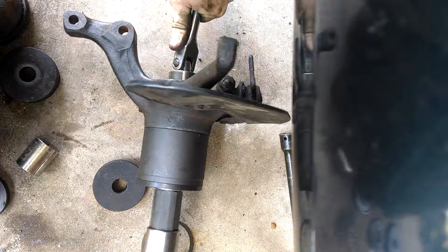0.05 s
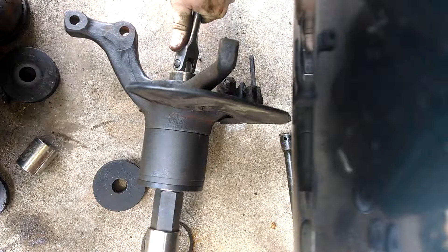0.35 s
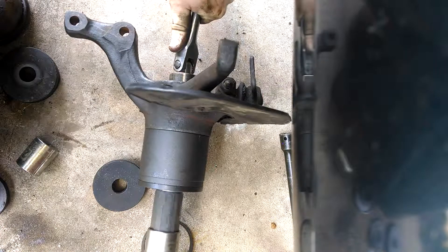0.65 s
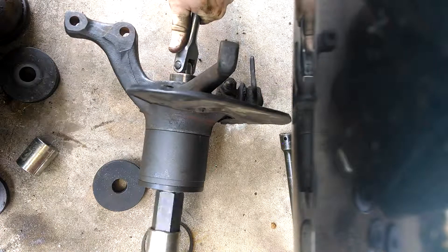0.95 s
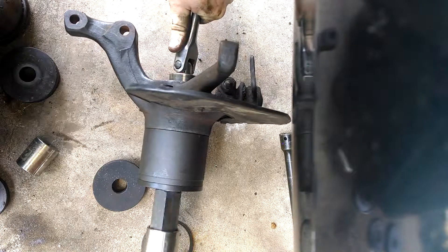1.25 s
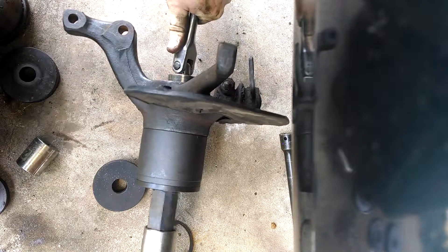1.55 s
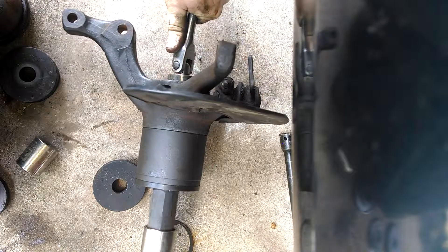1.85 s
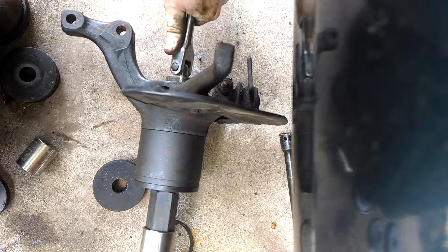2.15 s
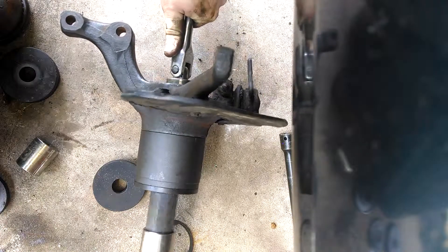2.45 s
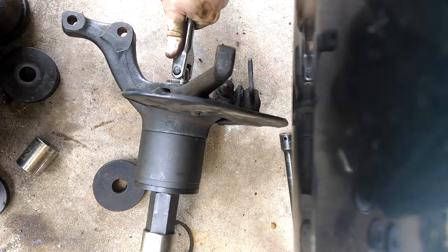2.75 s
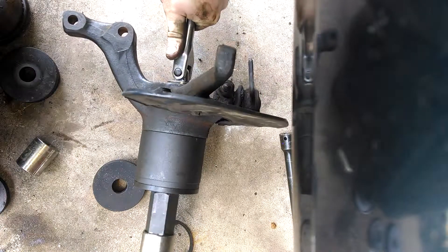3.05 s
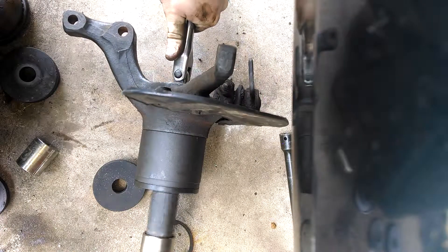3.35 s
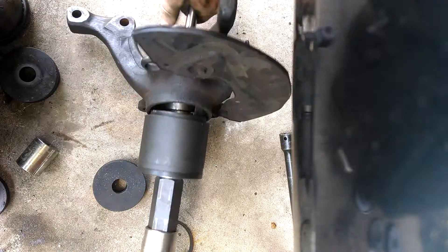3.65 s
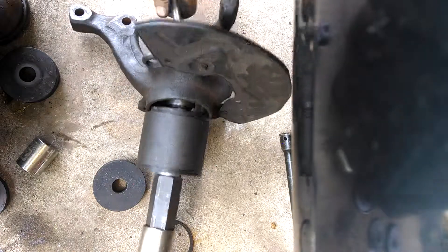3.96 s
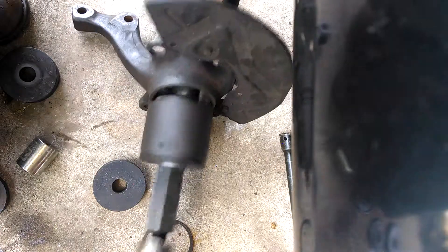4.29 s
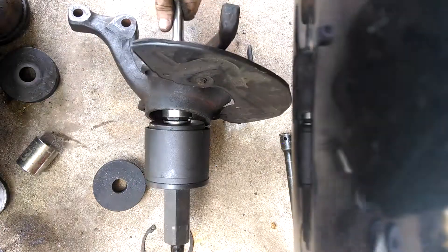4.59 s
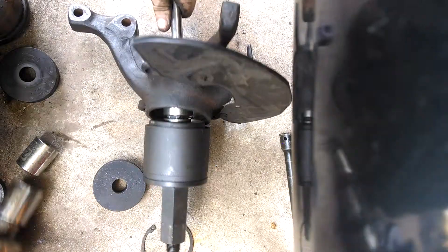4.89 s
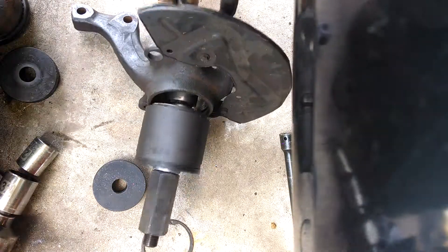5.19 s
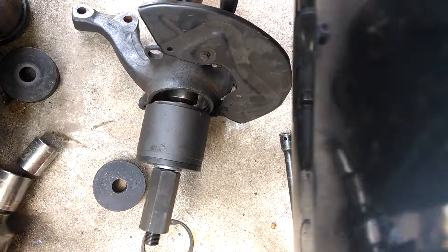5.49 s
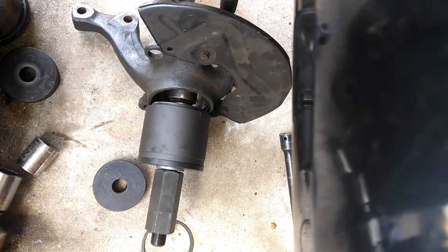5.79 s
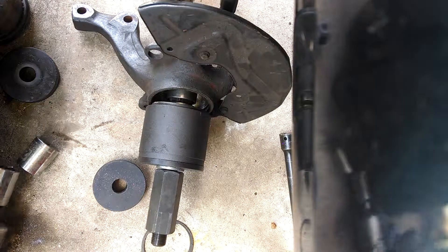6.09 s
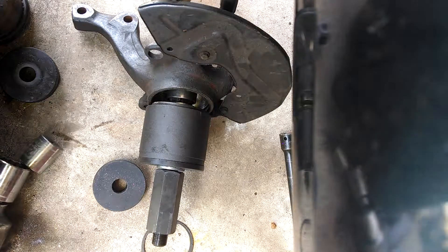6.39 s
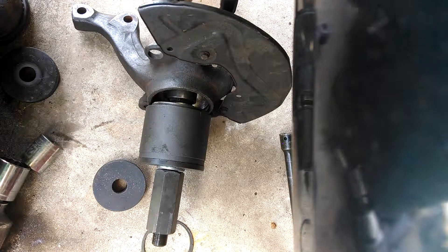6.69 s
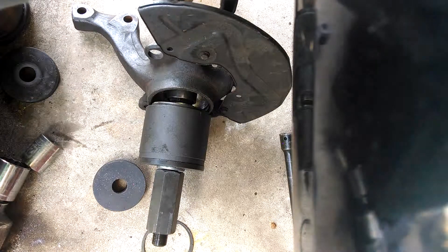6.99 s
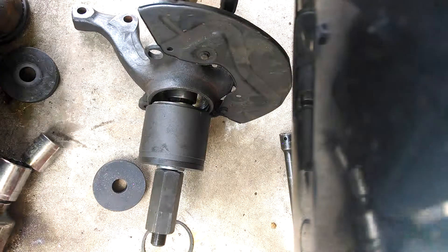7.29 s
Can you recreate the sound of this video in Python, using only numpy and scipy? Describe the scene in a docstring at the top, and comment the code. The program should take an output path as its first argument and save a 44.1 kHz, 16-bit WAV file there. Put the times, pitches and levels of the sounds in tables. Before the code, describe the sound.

An impact wrench hammers loudly on steel and stops, then loose metal parts clank over a droning workshop compressor.

```python
"""An impact wrench hammers a puller screw through a steering knuckle until the bearing comes free.
Each blow cracks steel on steel and rings the knuckle, over rattling play and the rush of the air motor.
The loose parts clank and a socket is set down, while a piston compressor drones in the workshop.
A gain control ducks under the blows, then slowly lets the drone swell back."""
import sys
import numpy as np
from scipy import signal
from scipy.fft import rfft, irfft
from scipy.io import wavfile
from scipy.ndimage import uniform_filter1d

SR = 44100
rng = np.random.default_rng(int(sys.argv[2]) if len(sys.argv) > 2 else 0)


def generate_wav(signal):
    """Clip the signal to [-1, 1] and save it as 16-bit WAV at the path in sys.argv[1]."""
    frames = np.transpose(np.atleast_2d(signal))
    scaled = np.clip(frames, -1, 1) * 32767
    pcm = np.round(scaled).astype(np.int16)
    wavfile.write(sys.argv[1], SR, pcm)


N = 323694
TIME, FREQS = np.arange(N) / SR, np.fft.rfftfreq(N, 1 / SR)
REBOUND_S, RELEASE_S = 0.033, 3.735  # hammer's bounce after a blow; trigger let go

# hammer blows, about sixteen a second: start_s, level_db
BLOWS = [(0.0014, -6.5), (0.0697, -5.5), (0.1288, -1.5), (0.1874, -4.5), (0.25, -2.5), (0.317, -5),
         (0.378, -5), (0.4379, -7), (0.5011, -3.5), (0.5642, -4), (0.627, -2), (0.687, -5), (0.756, -5),
         (0.7986, -4.5), (0.866, -4), (0.918, -6), (0.9783, -3), (1.0363, -2.5), (1.1051, -1), (1.1685, -3),
         (1.2347, -8), (1.297, -2.5), (1.367, -4), (1.4319, -1.5), (1.4932, -3), (1.551, -3), (1.6176, -2),
         (1.6834, -4.5), (1.7467, -5), (1.8052, -4), (1.864, -1.5), (1.922, -5), (1.992, 0), (2.0604, -2),
         (2.1324, -4), (2.1938, -5.5), (2.248, -6.5), (2.311, -5.5), (2.363, -6), (2.4088, -2.5),
         (2.4617, -3), (2.5319, -1.5), (2.587, -4.5), (2.6502, -3), (2.6963, -5.5), (2.7424, 0),
         (2.799, -4.5), (2.855, -2.5), (2.9156, -4.5), (2.979, -6), (3.0365, -6), (3.0968, -4),
         (3.154, -2.5), (3.211, -5.5), (3.267, -6.5), (3.325, -10), (3.3703, -8), (3.414, -5),
         (3.4617, -2.5), (3.4762, -5.5), (3.541, -3), (3.6205, -7), (3.654, -10.5), (3.678, -12),
         (3.694, -2.5), (3.7566, -1.5)]
# heavy blows that jolt the microphone: start_s, level_db
JOLTS = [(.003, -6), (0.32, 0), (0.378, -9), (1.172, -0.5), (1.619, 3), (1.686, 0), (1.75, -4),
         (1.865, -2.5), (2.589, -6), (2.8, -10), (2.857, -4), (3.373, -5), (3.416, -2.5), (3.467, 2.5),
         (3.622, -6), (3.697, -3)]
# left-right likeness, at the work (near) and across the shop (far): freq_hz, correlation
NEAR_LIKENESS = [(60, -0.5), (240, -0.05), (480, -0.27), (950, 1.03), (1900, 0.5), (2400, 1.02),
                 (2750, 0.9), (3500, 0.24), (4400, 0.36), (5100, 0.87), (6200, 0.5), (7700, 0.42),
                 (15000, -0.73)]
FAR_LIKENESS = [(60, 0.49), (150, 0.22), (380, 0.094), (950, 0.14), (1800, 0.97), (2500, 0.76),
                (3500, 0.48), (5150, 0.86), (6200, 0.29), (15000, .1)]
# how far the left side leads: freq_hz, lead_rad
NEAR_LEAD = [(0, 0), (1550, .4), (2300, -2.9), (2800, -3.3), (3700, -6.4), (4600, -3.3), (5400, -3.1),
             (6100, 0), (7060, .1), (7670, 3.3), (9300, -.6), (12800, 3.1), (15000, 1)]
FAR_LEAD = [(0, 0), (1460, -.5), (2300, -2.9), (2750, -3.4), (3700, -6.3), (5150, -9.4), (9470, -20),
            (16000, -35)]
# stereo balance: freq_hz, left_minus_right_db
NEAR_PAN = [(60, -1), (130, 13.5), (290, 10.5), (640, 4), (1410, 2.5), (3100, 0), (6820, 1.5), (15000, 4.5)]
FAR_PAN = [(60, -4), (99, 9), (160, -0.5), (270, 6.5), (450, -8.5), (740, -2.5), (1220, -1), (2010, -1.5),
           (3330, -2.5), (5500, 0), (9080, 1), (15000, 1.5)]
NEAR, FAR = (NEAR_LIKENESS, NEAR_LEAD, NEAR_PAN), (FAR_LIKENESS, FAR_LEAD, FAR_PAN)


def amp(db):
    """Decibels to gain."""
    return 10 ** (np.asarray(db) / 20)


def unit(x):
    """Scales to an rms of one."""
    return x / np.sqrt(np.mean(x ** 2) + 1e-20)


def read(points, hz):
    """Reads a table on a log-frequency axis."""
    freqs, values = np.transpose(points)
    return np.interp(np.log(hz + 1), np.log(freqs + 1), values)


def drift(rate_hz):
    """A smooth random wobble of unit size, no faster than rate_hz."""
    t = np.linspace(0, N / SR, 1500)
    speeds = rate_hz * np.geomspace(.1, 1, 12)
    wobble = np.sin(2 * np.pi * (speeds[:, None] * t + rng.random((len(speeds), 1)))).sum(0)
    return np.interp(TIME, t, unit(wobble))


def resonances(modes):
    """EQ curve of a set of resonant peaks."""
    return sum(amp(db) / (1 + ((FREQS - hz) / (width / 2)) ** 2) for hz, width, db in modes)


def noise(gain, place):
    """Coloured noise with the stereo image of one place."""
    likeness, lead, pan = (read(table, FREQS) for table in place)
    likeness = np.clip(likeness, -1, 1)
    left, other = rfft(rng.standard_normal((2, N)))
    right = (likeness * left + np.sqrt(1 - likeness ** 2) * other) * np.exp(-1j * lead)
    return unit(irfft(gain * np.array([left * amp(pan / 2), right * amp(-pan / 2)]), N))


def grain(gain, depth_db, place=NEAR, span_s=.09):
    """Noise with narrow, randomly shifting peaks, like the many close modes of steel."""
    spectrum = signal.stft(noise(gain, place), nperseg=1024)[2]
    peaks = uniform_filter1d(rng.standard_normal(spectrum.shape[1:]), int(span_s * SR / 512), axis=1)
    peaks = unit(uniform_filter1d(peaks, size=2, axis=0))
    return unit(signal.istft(spectrum * amp(depth_db * peaks))[1][:, :N])


def add(mix, s, sound):
    """Mixes a sound in at a time."""
    part = mix[..., max(round(s * SR), 0):][..., :sound.shape[-1]]
    part += sound[..., :part.shape[-1]]


def bursts(times, dbs, lengths, rise_s, tail_db, t60_s):
    """Envelope of hits: a brief chatter of steel on steel, then a dying tail."""
    t, power = np.arange(SR // 3) / SR, np.zeros(N)
    attack = (1 - np.exp(-t / rise_s)) ** 2
    for s, db, length, tail in zip(times, dbs, lengths, tail_db + np.zeros(len(times))):
        chatter = np.sqrt(2) * np.exp(-(t / max(length, 1e-3)) ** 2)
        add(power, s, amp(2 * db) * attack * (chatter + amp(2 * (tail - 60 * t / t60_s))))
    return np.sqrt(power)


def since_blow():
    """Seconds since the hammer last struck."""
    s = np.array(BLOWS)[:, 0]
    return np.maximum(TIME - s[np.maximum(np.searchsorted(s, TIME) - 1, 0)], 0)


def airflow_db(creep_db_per_s=0.8, cutoff_db_per_s=303):
    """Air flow creeps up while the trigger is held and dies once it is let go."""
    held_db = -26 + creep_db_per_s * np.minimum(TIME, RELEASE_S)
    return held_db - cutoff_db_per_s * np.clip(TIME - RELEASE_S, 0, 1)


def steel(hits, echo_s=.0112, echo_db=-4):
    """Each hit cracks and shakes the knuckle; a looser bearing rings more and the knuckle less."""
    # tone of the contact and of the body under it: freq_hz, level_db
    crack_eq = [(1800, -17), (2500, 1.5), (3200, -4), (4100, 0.5), (5100, 1), (6400, -4.5), (7500, -2.5),
                (8500, -3.5), (9300, -6.5), (10300, -1.5), (11000, -7.5), (11600, -6), (12900, -13),
                (14000, -14), (15000, 0)]
    body_eq = [(150, -15.5), (400, 2), (650, -3), (1000, -1.5), (1400, -1.5), (1950, 4), (2400, -1.5),
               (3200, -46)]
    # modes of the clamped knuckle and the freed bearing: pitch_hz, width_hz, level_db
    knuckle_modes = [(1926, 170, 7.5), (3193, 110, 9), (3664, 120, 4.5), (3870, 140, 3.5), (4640, 150, -4),
                     (5830, 180, 0.5), (6320, 230, 2.5)]
    bearing_modes = [(8570, 610, 10), (15000, 300, 3), (6550, 900, -4)]
    # how freely the bearing rings: time_s, level_db
    looseness = [(2.7, -22), (3.15, -12), (3.35, -9), (3.48, -5.5), (3.75, -6.5), (4.4, -19), (4.94, -7)]
    s, db, body_db, length = np.transpose(hits)
    tail_db = -8 * amp(np.interp(s, *np.transpose(looseness))) ** 2
    highs = 1 / (1 + (7000 / (FREQS + 1)) ** 4)
    colour = amp(read(crack_eq, FREQS))
    crack = grain(colour * (1 - highs), depth_db=5.5)
    crack *= bursts(s, db - 7.5, length, rise_s=.0003, tail_db=tail_db - 0.5, t60_s=0.14)
    sizzle = grain(colour * highs, depth_db=4.5)
    sizzle *= bursts(s, db - 1, length, rise_s=.0003, tail_db=tail_db - 4, t60_s=0.11)
    body = grain(amp(read(body_eq, FREQS)), depth_db=2.5)
    body *= bursts(s, db + body_db + 2, 0.62 * length, rise_s=.0003, tail_db=tail_db - 3.5, t60_s=0.1)
    # a nearby wall throws the body back, sides swapped
    slapback = amp(echo_db) * np.pad(body[::-1], ((0, 0), (round(echo_s * SR), 0)))[:, :N]
    knuckle = grain(resonances(knuckle_modes), depth_db=6.5)
    knuckle *= bursts(s, db - 14.5, length, rise_s=.0018, tail_db=tail_db + 1, t60_s=0.15)
    bearing = grain(resonances(bearing_modes), depth_db=4)
    bearing *= bursts(s, db - 1, length, rise_s=.00077, tail_db=-1, t60_s=0.12)
    bearing *= amp(np.interp(TIME, *np.transpose(looseness)))
    return crack + sizzle + body + slapback + knuckle + bearing


def hammering(chatter_s=0.0051, slide_at_s=3.32, rebound_chatter_s=.002):
    """The hammer drives the steel and rebounds weakly after each blow while the trigger is held."""
    s, db = np.transpose(BLOWS)
    is_jolt = abs(s[:, None] - np.array(JOLTS)[:, 0]).min(1) < .01
    body_db = -17 + 3 * is_jolt
    # the chatter draws out while the bearing slides from its seat
    length = chatter_s + 0.008 * np.exp(-((s - slide_at_s) / 0.1) ** 2)
    blows = np.column_stack([s, db, body_db, length])
    late, force = rng.standard_normal((len(s), 2)).T
    rebound_at = s + REBOUND_S * (1 + 0.06 * late)
    rebound_db = db - 13.5 + 3.2 * force
    rebounds = np.column_stack([rebound_at, rebound_db, body_db, np.full(len(s), rebound_chatter_s)])
    return steel(np.vstack([blows, rebounds[rebound_at < RELEASE_S]]))


def bite(count=4, delay_s=.0016, gap_s=.001, fall_db=3):
    """The hammer meets the anvil in a quick, weakening run of dry clicks."""
    # bright resonances of hammer and anvil: pitch_hz, width_hz, level_db
    anvil_modes = [(1400, 1500, -14), (3300, 620, -3), (4200, 820, 9), (5900, 1800, 1), (9900, 1500, -7),
                   (11700, 900, -5), (14900, 1100, -10)]
    clicks = np.zeros((2, N))
    for s, db in BLOWS:
        for k in range(count):
            at = s + delay_s + gap_s * (k + rng.uniform(-.5, .5))
            add(clicks, at, amp(db + 8.5 - fall_db * k) * unit(rng.standard_normal((2, 3))) / 2)
    return irfft(rfft(clicks) * resonances(anvil_modes), N)


def thumps(push_s=0.00094, right_db=-3.0):
    """A jolt is one push and a slow rebound, felt in opposite directions left and right."""
    out, age = np.zeros((2, N)), np.arange(SR // 10) / SR / push_s
    push = age * np.exp(1 - age) - age / 36 * np.exp(1 - age / 6)
    for s, db in JOLTS:
        add(out, s, amp(db) * np.array([push, -amp(right_db) * push]))
    return out


def rattle(ticks_per_s=220, settle_db_per_s=150):
    """The socket and the puller chatter in their play, settling after each rebound."""
    # resonances of the loose fit: pitch_hz, width_hz, level_db
    play_modes = [(3650, 2050, 0.5), (6530, 2200, -3), (8270, 950, -8.5), (9880, 1250, 1.5),
                  (11500, 1300, -4), (15200, 2300, 0)]
    gap_draw, level_draw = rng.random((1700, 2)).T
    s = np.cumsum(-np.log(gap_draw)) / ticks_per_s
    db = 3 - 3 * np.log(np.maximum(level_draw, .1))
    ticks = bursts(s, db, np.full(len(s), .0016), rise_s=0.00023, tail_db=-14.5, t60_s=0.048)
    settled_db = settle_db_per_s * np.maximum(since_blow() - REBOUND_S, 0)
    return grain(resonances(play_modes), depth_db=5) * ticks * amp(airflow_db() - settled_db)


def air_motor(rotor_hz=308.6, check_hz=170.4, spin_up_s=.054, free_from_s=3.49, free_to_s=3.715):
    """Air rushes out of the wrench; its rotor is checked by every blow and spins up again."""
    # tone of the exhaust: freq_hz, level_db
    exhaust_eq = [(25, -24), (60, -11), (110, -6.5), (200, -3.5), (355, 3), (649, -8.5), (1200, -4.5),
                  (1900, 0.5), (4000, -1), (6200, -9), (8500, -7), (10000, -5), (14800, -16), (16000, -26)]
    rush = grain(amp(read(exhaust_eq, FREQS)), depth_db=2.5)
    rush *= amp(airflow_db() + 2.5 + 2 * drift(rate_hz=60))
    since = since_blow()
    turn = 2 * np.pi * np.cumsum(rotor_hz - check_hz * np.exp(-since / spin_up_s)) / SR
    vanes = (np.sin(turn) + 0.33 * np.sin(2 * turn)) * amp(airflow_db() - 18.5)
    # once the load lets go it whines, gathering speed between the last blows
    unloaded = np.clip(np.minimum(TIME - free_from_s, free_to_s - TIME) / 0.027, 0, 1)
    whine_hz = 242.7 + 1000 * since
    whine = amp(-26) * np.sin(2 * np.pi * np.cumsum(whine_hz) / SR)
    return rush + vanes + unloaded * whine


def piston_drone(turn, stroke_hz, chug_hz=480, in_step_hz=700, move_at_s=6.48):
    """Each stroke chugs in the intake: low harmonics keep step, the room smears the higher ones."""
    # the first thirty harmonics: harmonic, level_db
    low_harmonics = [(1, -13.5), (2, -22), (3, -9.5), (4, -5.5), (5, -18), (6, -12), (7, -19), (8, -0.5),
                     (9, -3.5), (10, -4), (11, -4.5), (12, -12), (13, -7.5), (14, -12.5), (15, -8),
                     (16, -13), (17, -13.5), (18, -14.5), (19, -13), (20, -14), (21, -17.5), (22, -10.5),
                     (23, -11.5), (24, -12.5), (25, -12.5), (26, -12), (27, -9), (28, -15), (29, -17),
                     (30, -13.5)]
    # roll-off of those above: freq_hz, level_db
    upper_eq = [(1650, -20.5), (2000, -14.5), (2500, -21.5), (3100, -23.5), (3680, -30), (4500, -44)]
    # standing waves shift as the listener moves: harmonic, change_db
    room_shift = [(11, 4), (14, -9), (17, -10.5), (19, -13), (22, -6), (28, 4), (30, 7)]
    levels, changes = dict(low_harmonics), dict(room_shift)
    moved = .5 * np.tanh((TIME - move_at_s) / 0.27)
    drone = np.zeros((2, N))
    for k in range(1, 85):
        hz = k * stroke_hz
        scatter, apart, late = rng.standard_normal(3)
        db = levels.get(k, read(upper_eq, hz) + 3 * scatter) + changes.get(k, 0) * moved
        gain = amp(db) * (1 + 0.14 * min(np.sqrt(hz / 450), 2) * drift(rate_hz=4))
        likeness, lead, pan = (read(table, hz) for table in FAR)
        lead += 1.08 * apart * np.sqrt(1 - np.clip(likeness, 0, 1)) * min(hz / 1000, 1)
        sweep = .145 * (k - chug_hz / stroke_hz) ** 2  # draws the chug into a short chirp
        smear = 2 * np.pi * late * np.clip(hz / in_step_hz - 1, 0, 1)
        phase = k * (turn + np.pi) + sweep + smear  # half a turn from the valves
        drone[0] += gain * amp(pan / 2) * np.cos(phase)
        drone[1] += gain * amp(-pan / 2) * np.cos(phase - lead)
    return unit(drone)


def compressor(stroke_hz=53.56):
    """A piston drones and its drive whines; valve hiss and tank ring pulse with every stroke."""
    # tone of the workshop's wash: freq_hz, level_db
    shop_eq = [(25, -37), (109, -17.5), (213, -8), (430, -1), (680, -6), (870, -4), (1420, -7.5),
               (2500, -7), (3630, -11.5), (5140, -14.5), (6370, -14.5), (15000, -23)]
    # resonances of tank and pipes, drive and valves: pitch_hz, width_hz, level_db
    tank_modes = [(1981, 12, 9.5), (3130, 23, -5), (3683, 30, 7), (4330, 25, 3), (4720, 63, 0),
                  (5640, 52, 0.5), (6200, 86, -13)]
    drive_modes = [(818.5, 5.2, 0.5), (1255, 41, -12)]
    valve_modes = [(3600, 290, -16), (6305, 350, 3.5), (8980, 630, 0), (14240, 880, -4)]
    turn = 2 * np.pi * np.cumsum(stroke_hz * (1 + 0.0006 * drift(rate_hz=3))) / SR
    pulse = 1 + 0.5 * np.cos(turn)
    drone = amp(-16) * piston_drone(turn, stroke_hz)
    wash = amp(-23.5) * grain(amp(read(shop_eq, FREQS)), depth_db=2.5, place=FAR, span_s=1.8)
    wash *= 1 + 0.026 * np.cos(turn)
    tank = amp(-35) * noise(resonances(tank_modes), FAR) * pulse
    whine = amp(-29.5) * noise(resonances(drive_modes), FAR)
    rumble = amp(-40) * noise(resonances([(62, 21, 0)]), FAR)
    hiss = amp(-35) * grain(resonances(valve_modes), depth_db=3, place=FAR, span_s=1.5) * pulse
    return drone + wash + tank + whine + rumble + hiss


def early_brightness(x, shelf_hz=750, lift_db=2.5, dull_at_s=5.08):
    """The treble stands a little higher at first, then settles."""
    treble = irfft(rfft(x) * FREQS ** 4 / (FREQS ** 4 + shelf_hz ** 4), N)
    fade = .5 * (1 - np.tanh((TIME - dull_at_s) / 0.22))
    return x + treble * (amp(lift_db) - 1) * fade


def bearing_slips():
    """The bearing jerks forward in its seat with short, heavily damped thuds, dead centre."""
    # jerks: start_s, level_db, pitch_hz, t60_s
    jerks = [(.3185, -9, 300, .008), (1.8652, -7.5, 380, 0.012), (2.7997, -11, 550, .017),
             (2.856, -12, 430, .011), (3.373, -21, 362, .04), (3.418, -14, 726, .025),
             (3.4628, -4, 1100, 0.014), (3.4652, -5, 480, .008), (3.4721, -8.5, 260, 0.01),
             (3.5415, -6, 750, 0.0046), (3.6217, -6, 420, 0.0065), (3.697, -17, 1300, .025),
             (3.757, -9, 474, .019)]
    out, t = np.zeros((2, N)), np.arange(SR // 10) / SR
    for s, db, hz, t60 in jerks:
        add(out, s, amp(db - 60 * t / t60) * np.sin(2 * np.pi * hz * t))
    return out


def knocks():
    """Steel knocks, short and damped, as the bearing breaks free and parts are set on the concrete."""
    # contacts: start_s, level_db, pitch_hz, width_hz, t60_s
    contacts = [(3.679, -14.5, 1100, 900, 0.059), (3.694, -3, 2880, 1700, 0.06),
                (4.696, -26, 3680, 2200, .07), (4.822, -29, 7000, 7000, .025),
                (4.937, -11, 4100, 900, 0.027), (5.047, -14.5, 3870, 3000, 0.064),
                (6.378, -31, 4200, 900, 0.035), (6.382, -19.5, 2400, 3400, 0.037)]
    out = np.zeros((2, N))
    for s, db, hz, width, t60 in contacts:
        envelope = (TIME > s) * amp(db - 60 * abs(TIME - s) / t60)
        out += noise(resonances([(hz, width, 0)]), NEAR) * envelope
    return out


def clanks():
    """The loosened parts clank together, steel on steel."""
    # clanks: start_s, level_db, body_offset_db, chatter_s
    hits = [(4.381, -20.5, -23, 0.024), (4.936, -13, -11, 0.0022), (4.983, -29, -5, 0.03),
            (5.104, -38.5, 3, 0.042)]
    return steel(hits)


def ring(modes, start_s, level_db, split_hz=12, blur=0.005):
    """A struck part rings with close pairs of modes, blurred as it chatters on what it touches."""
    out, t = np.zeros((2, N)), np.arange(SR) / SR
    for hz, db, t60 in modes:
        phase, twin_phase = rng.uniform(-1.5, 1, (2, 2, 1))
        wander = np.cumsum(rng.standard_normal(SR)) * np.sqrt(2 * np.pi * blur * hz / SR)
        tone = np.sin(2 * np.pi * hz * t + phase + wander)
        twin = 0.28 * np.sin(2 * np.pi * (hz + split_hz * rng.uniform(1, 2)) * t + twin_phase)
        add(out, start_s, amp(level_db + db - 60 * t / t60) * (tone + twin))
    return out


def ringing_parts():
    """The ratchet clinks on the nut, then the sleeve and the socket ring out."""
    # modes of each part: pitch_hz, level_db, t60_s
    nut_modes = [(4048, 0, 0.11), (5950, 3.5, 0.091), (8150, -7, .08), (11600, -14, .1), (9394, -14, .063)]
    sleeve_modes = [(843, 1, 0.22), (923, -6, 0.88), (1590, -2, 0.2), (1660, -4, 0.55), (3350, -12, 0.33),
                    (6960, -4.5, .1), (14950, -3, 0.16)]
    socket_modes = [(923, -5.5, 0.5), (1420, -2, 0.22), (1774, 2.5, 0.33), (1893, 0.5, 0.22),
                    (2920, -12.5, 0.18), (3600, -8, 0.28), (3980, -11, 0.13)]
    nut = ring(nut_modes, start_s=4.382, level_db=-17.5)
    sleeve = ring(sleeve_modes, start_s=4.985, level_db=-23.5)
    socket = ring(socket_modes, start_s=5.104, level_db=-23.5)
    return nut + sleeve + socket


def scene():
    """The close wrench towers over the clanks and the compressor."""
    blows = amp(-0.16) * hammering() + bite() + amp(0.5) * thumps() + bearing_slips()
    wrench = amp(17.5) * (blows + rattle() + air_motor())
    parts = amp(10.5) * ringing_parts() + amp(12) * clanks() + amp(7.5) * knocks()
    return wrench + parts + early_brightness(compressor())


def record(dry, limit_db=-8.0, recover_db_per_s=11.0, cutoff_hz=15500):
    """Gain control with a fast attack and a slow release, full-scale clipping, then a low-pass."""
    power_db = 10 * np.log10(abs(uniform_filter1d((dry ** 2).mean(0), size=600)) + 1e-12)
    climb_db = recover_db_per_s * TIME
    held_db = np.maximum.accumulate(power_db + climb_db) - climb_db
    duck_db = uniform_filter1d(np.maximum(held_db - limit_db, 0), size=200)
    clipped = np.clip(dry * amp(-duck_db), -1, 1)
    lowpass = signal.firwin(255, cutoff_hz, window=("kaiser", 7), fs=SR)
    return signal.oaconvolve(clipped, lowpass[None], "same")


dry = scene()
out = record(dry)
generate_wav(out)
```